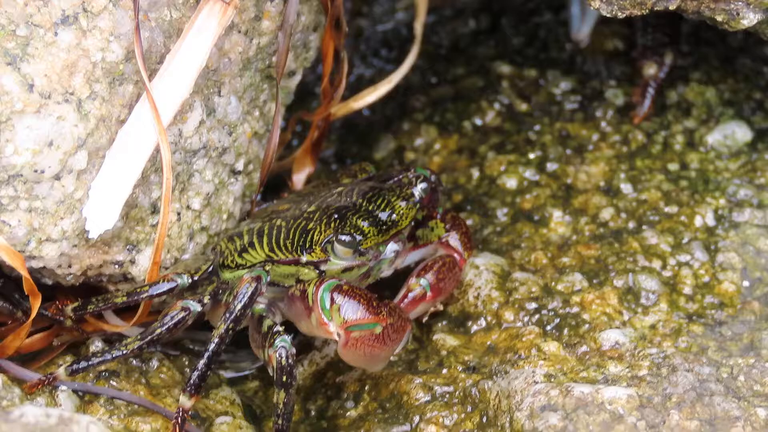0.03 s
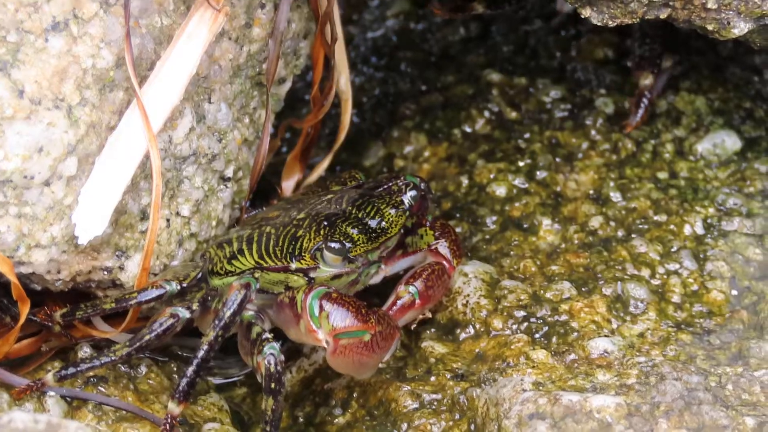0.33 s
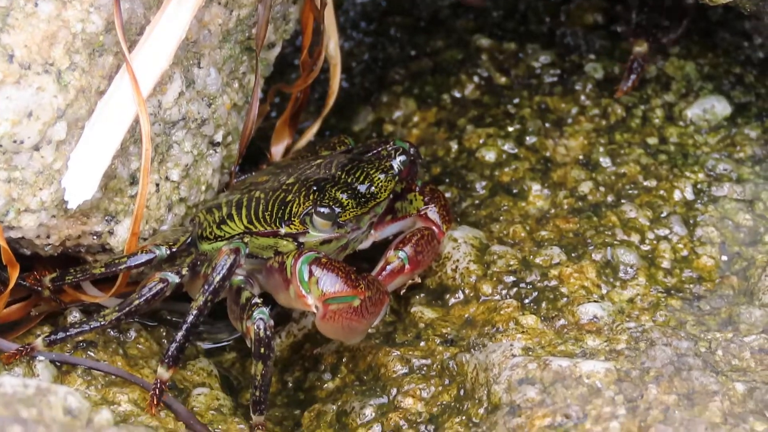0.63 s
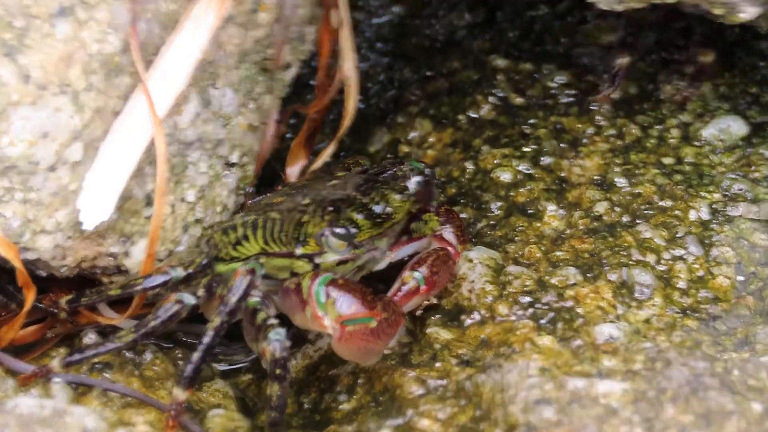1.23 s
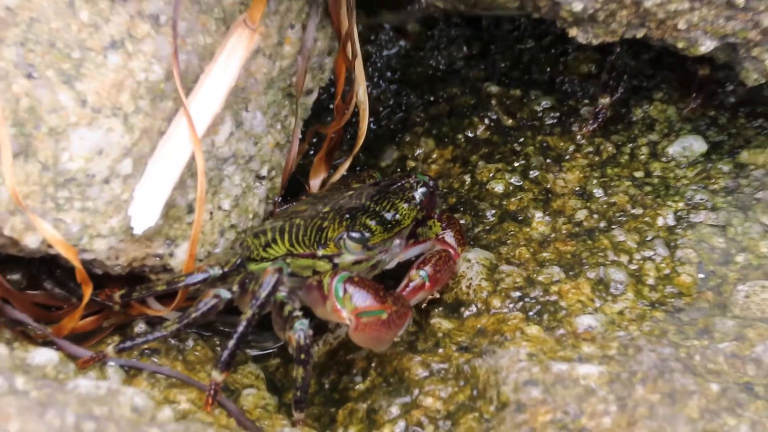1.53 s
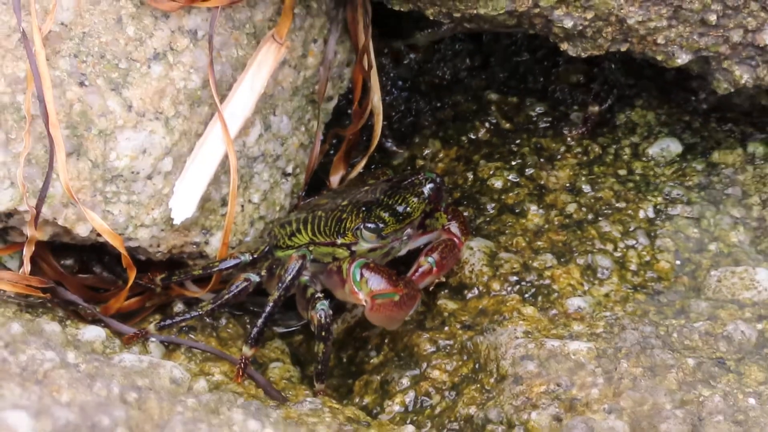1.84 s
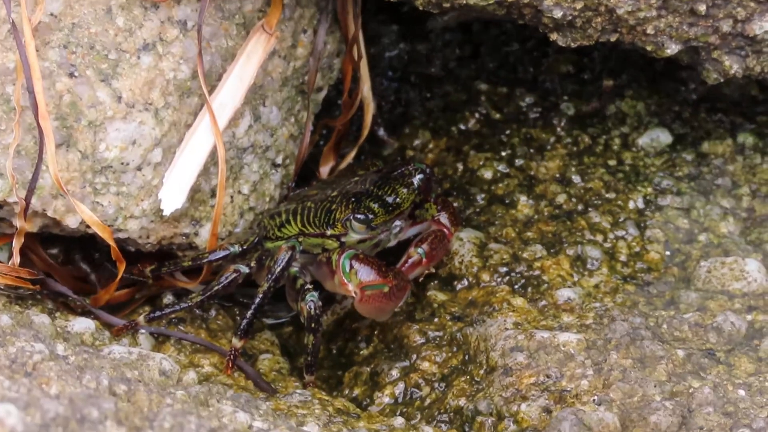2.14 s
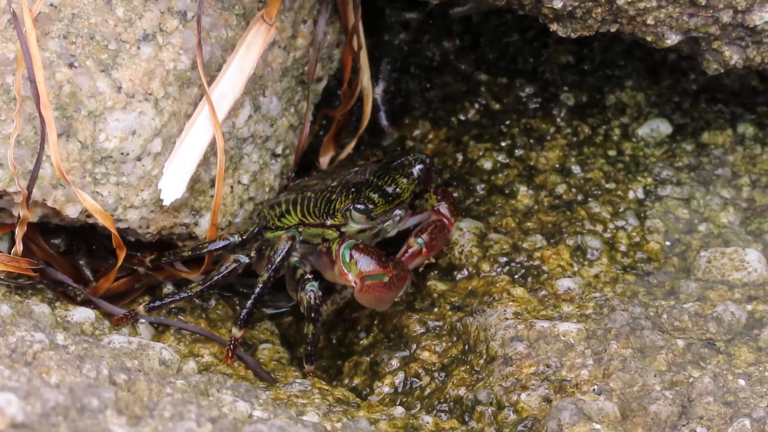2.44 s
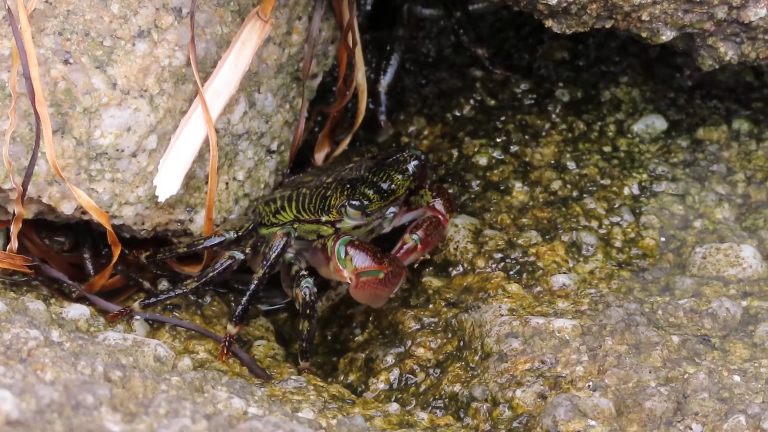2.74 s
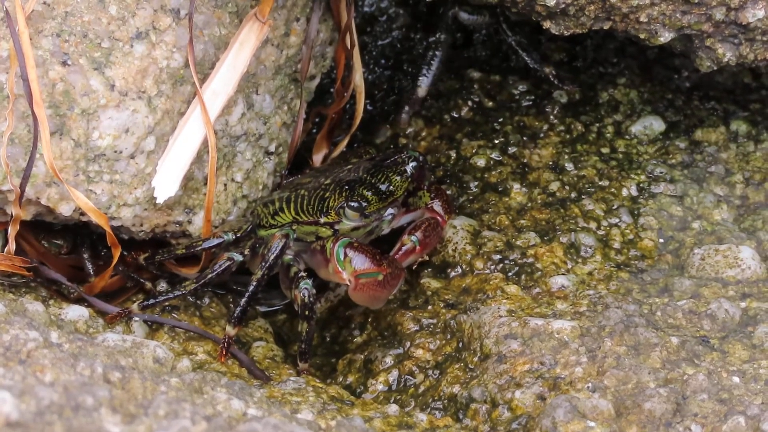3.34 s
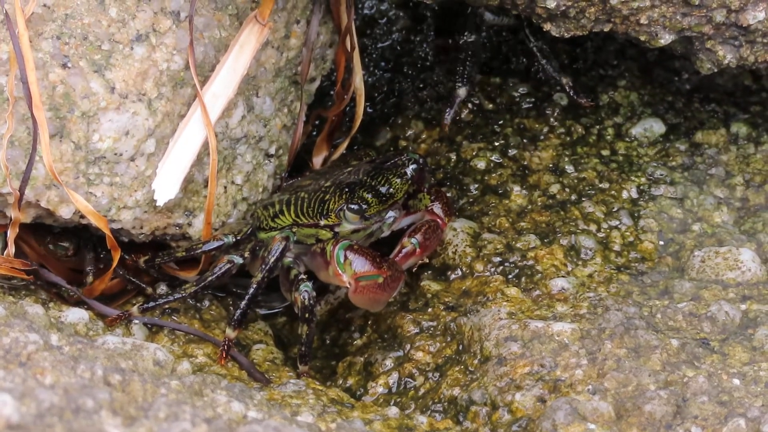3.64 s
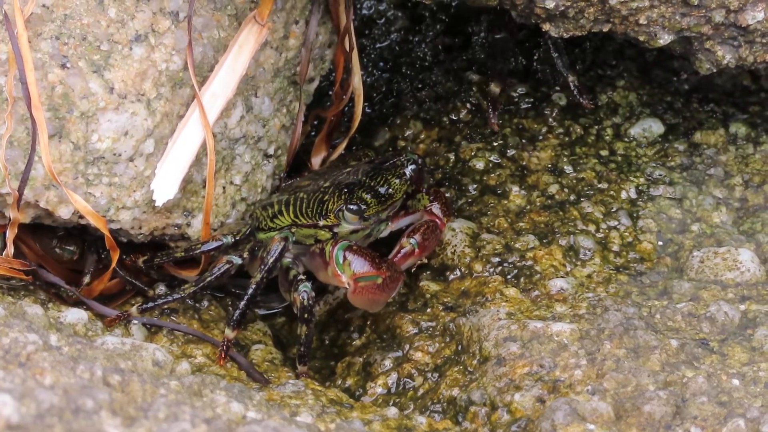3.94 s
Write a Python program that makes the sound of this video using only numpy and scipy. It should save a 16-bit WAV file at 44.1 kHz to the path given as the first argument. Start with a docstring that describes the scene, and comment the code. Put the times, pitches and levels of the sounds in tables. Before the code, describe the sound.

Wind rumbles on the microphone over steady surf, small sloshes and a distant engine hum.

```python
"""Among rocky tide pools, in stereo. The sound cuts in on wind rumbling at the microphone, the steady
roar of the far sea, a nearer wash with hissing foam and the hum of a far engine. Close by, water sloshes,
tiny bubbles tick on the wet stone and air pockets glug between the rocks. At about 1.4 s the nearer wash
drops away for half a second, then builds again, with more sloshes and ticks."""
import sys
import numpy as np
from scipy import signal
from scipy.fft import rfft, irfft
from scipy.io import wavfile
from scipy.ndimage import uniform_filter1d

SR = 44100
rng = np.random.default_rng(int(sys.argv[2]) if len(sys.argv) > 2 else 0)


def waveform_to_disk(signal):
    """Save audio, clipped to [-1, 1], as 16-bit WAV at the path in sys.argv[1]."""
    frames = np.transpose(np.atleast_2d(signal))
    scaled = np.clip(frames, -1, 1) * 32767
    samples = np.round(scaled).astype(np.int16)
    wavfile.write(sys.argv[1], SR, samples)


N = 176400


def undb(db):
    """Decibels to gain."""
    return 10 ** (np.asarray(db) / 20)


def clock():
    """Time of every sample in seconds."""
    return np.arange(N) / SR


def curve(table, column):
    """One column of a table joined by straight lines in time."""
    rows = np.array(table)
    return np.interp(clock(), rows[:, 0], rows[:, column])


def walk(rate_hz):
    """Random levels held 1 / rate_hz seconds and smoothed twice; spread 1."""
    hold = max(int(SR / rate_hz), 2)
    steps = np.repeat(rng.standard_normal(400), hold)[:N]
    smooth = uniform_filter1d(uniform_filter1d(steps, hold), hold)
    return np.resize(smooth / smooth.std(), N)


def noise(spectrum):
    """Noise of rms 1, coloured by rows of (frequency [Hz], level [dB]), falling steeply past the ends."""
    hz, db = np.array(spectrum, float).T
    log_hz = np.log(np.maximum(np.fft.rfftfreq(N, 1 / SR), 1))
    beyond = log_hz - np.clip(log_hz, np.log(hz[0]), np.log(hz[-1]))
    colour = undb(np.interp(log_hz, np.log(hz), db)) * np.exp(-2 * np.abs(beyond))
    coloured = irfft(rfft(rng.standard_normal(N)) * colour, N)
    return coloured / coloured.std()


def wide(spectrum, side_db, pan_db=0, lag_s=0):
    """Mid-side stereo noise; positive pan leans left, and the left channel arrives lag_s late."""
    mid, side = noise(spectrum), undb(side_db) * noise(spectrum)
    delay = np.exp(-2j * np.pi * np.fft.rfftfreq(N, 1 / SR) * lag_s)
    left = irfft(rfft(mid + side) * delay, N)
    return np.array([left * undb(pan_db / 2), (mid - side) * undb(-pan_db / 2)])


def swells(table, octaves):
    """Short swells of noise, each 12 dB down this many octaves either side of its centre frequency."""
    out = np.zeros(N)
    for at, half_length, hz, db in table:
        shape = np.exp(-((clock() - at) / half_length) ** 2)
        swell = shape * noise([(hz / 2 ** octaves, -12), (hz, 0), (hz * 2 ** octaves, -12)])
        out += undb(db) * swell * np.linalg.norm(shape) / np.linalg.norm(swell)
    return out


def wind():
    """Wind at the microphone: a gusty low rumble with short buffets."""
    # Colour of the rumble (frequency [Hz], relative level [dB])
    spectrum = [(15, -16), (28, -4.5), (45, -2), (75, 0.5), (110, -0.5), (135, 0), (175, -5.5), (215, -5.5),
                (250, -20), (400, -35)]
    # Buffets (time [s], half-length [s], centre [Hz], level [dB])
    buffets = [(.355, 0.026, 136, -31), (.44, 0.0075, 139, -35), (.53, 0.0087, 156, -30.5),
               (.645, 0.01, 175, -32.5), (1.302, .012, 75, -32.5), (1.415, 0.026, 122, -36.5),
               (1.6, 0.095, 52.6, -39), (2.73, 0.014, 71.5, -25.5), (3.325, 0.0214, 116, -34.5),
               (3.975, .02, 71, -28.5)]
    level_db, gust_db = -36.5, 0.35
    rumble = wide(spectrum, side_db=-26) * undb(level_db + gust_db * walk(12.0))
    return rumble + swells(buffets, octaves=0.44)


def far_sea():
    """Breakers far off merge into a steady roar, heaving slightly."""
    # Colour of the roar (frequency [Hz], relative level [dB])
    spectrum = [(120, -2), (260, 0.5), (380, 0.9), (460, -2), (535, 0.5), (630, -10), (820, -11),
                (1500, -21), (3200, -39.5), (5500, -36), (10000, -41), (15500, -57)]
    level_db, heave_db = -44.5, 0.64
    return wide(spectrum, side_db=-8, pan_db=-0.5) * undb(level_db + heave_db * walk(6.46))


def near_surf():
    """Nearer water churns and fizzes a little to the right; its wide foam hiss narrows in the lull."""
    # Course of the surf (time [s], wash [dB], fizz [dB], foam [dB], gain on the foam's side signal [dB])
    surf = [(.1, -46.5, -65.5, -57, -2), (.45, -46, -56.5, -58.5, 1), (.72, -46.5, -61.5, -58.5, 0),
            (.89, -45.5, -60, -59, 0), (1.15, -48.5, -60.5, -60, -0.5), (1.37, -49.5, -64, -57.3, -2),
            (1.44, -58, -68, -58, -15), (1.97, -57.5, -70, -58.5, -14), (2.0, -46.5, -64.5, -56.5, -4),
            (2.2, -48, -63, -59, -1), (2.42, -46.5, -62, -60.5, 1), (2.6, -45, -58.5, -60, -2),
            (2.74, -46, -62, -60.3, 1.5), (2.97, -44.5, -58, -60.5, -1), (3.15, -42.5, -56.5, -59, 1),
            (3.35, -44.6, -56, -60, 1), (3.62, -43, -56.5, -56, -1), (3.73, -45, -55, -57, .5),
            (3.85, -45, -53, -57, 0), (4, -45, -55, -58, 0)]
    # Colours of churning water, fizzing crests and foam (frequency [Hz], relative level [dB])
    wash_spectrum = [(200, -8), (400, 0), (650, 2), (1000, -0.8), (1600, -3.5), (2300, -9.5), (3200, -20),
                     (5000, -34), (9000, -50)]
    fizz_spectrum = [(1100, -13), (1900, -2.5), (2800, 1.5), (3600, -0.5), (5000, -10), (7000, -13),
                     (10000, -36)]
    foam_spectrum = [(900, -5.5), (2000, 5), (3000, 0.5), (4500, -2), (7000, -6.5), (10000, -11.5),
                     (13000, -15), (15500, -21)]
    lag_s = .000038
    churn_db = 0.65 * walk(16)  # moves wash and fizz together
    wash = wide(wash_spectrum, side_db=-11.5, pan_db=-2.5, lag_s=lag_s / 2)
    wash *= undb(curve(surf, column=1) + churn_db)
    fizz = wide(fizz_spectrum, side_db=-7, pan_db=-2.5, lag_s=lag_s)
    fizz *= undb(curve(surf, column=2) + churn_db)
    foam = wide(foam_spectrum, side_db=-5, pan_db=0.3, lag_s=lag_s)
    foam *= undb(curve(surf, column=3) + walk(7.4))
    foam_mid = foam.mean(axis=0)
    foam_side = (foam - foam_mid) * undb(curve(surf, column=4))
    return wash + fizz + foam_mid + foam_side


def far_engine():
    """Only two low orders and a dull rumble carry this far; the hum creeps up and wavers in the wind."""
    # Course of the engine (time [s], hum [Hz], level [dB])
    course = [(.1, 145.7, -37), (.9, 147.5, -40), (1.5, 150.4, -38.5), (1.85, 149.2, -43.5),
              (2.2, 150, -37), (2.58, 150.1, -31), (2.73, 149.9, -35.5), (3.0, 151.3, -33.5),
              (3.5, 154, -36.5), (4, 153.6, -39)]
    # Engine orders (multiple of the firing rate, relative level [dB])
    orders = [(1, -10.5), (2, -1.5)]
    # Colour of the rumble (frequency [Hz], relative level [dB])
    rumble_spectrum = [(140, -16), (165, 0), (185, -2), (215, -8), (245, -14.5)]
    waver_db, rumble_db, wander_rad = 1.1, -6.5, 0.28
    hum_phase = 2 * np.pi * np.cumsum(curve(course, column=1)) / SR + wander_rad * walk(22)
    firing_phase = hum_phase / 2
    hum = np.zeros(N)
    for order, db in orders:
        amplitude = np.sqrt(2) * undb(db + waver_db * walk(18))
        hum += amplitude * np.sin(order * firing_phase + 2 * np.pi * rng.random())
    rumble = undb(rumble_db) * noise(rumble_spectrum)
    return (hum + rumble) * undb(curve(course, column=2))


def sloshes():
    """Water slops among the nearby rocks in short, dull swells."""
    # Sloshes (time [s], half-length [s], centre [Hz], level [dB])
    slops = [(.33, 0.024, 320, -42), (2.216, 0.034, 826, -46), (2.68, 0.028, 403, -44)]
    return swells(slops, octaves=0.38)


def bubble_ticks():
    """Tiny bubbles burst close by: a very short high ring and a faint scatter off the stone."""
    # Bursting bubbles (time [s], pitch [Hz], level [dB], decay [s])
    bursts = [(.87, 13500, -59, .0007), (1.49, 13900, -60, .0007), (2.514, 12000, -50.5, .0013),
              (2.679, 14300, -56.5, .0007), (3.6425, 14300, -48, .0008), (3.8055, 14300, -44.5, 0.0011)]
    scatter_width_hz, tail_db, tail_s = 1700, -13, .004
    out = np.zeros((2, N))
    for at, hz, db, decay in bursts:
        age = np.maximum(clock() - at, 0)
        ring = np.exp(-age / decay) * np.sin(2 * np.pi * hz * age)
        band = signal.iirpeak(hz, hz / scatter_width_hz, fs=SR)
        scatter = signal.lfilter(*band, rng.standard_normal((2, N)))
        tail = (age > 0) * undb(tail_db) * np.exp(-age / tail_s)
        out += undb(db) * (ring + tail * scatter / scatter.std())
    return out


def glugs():
    """Air pockets in a crevice ring for a few cycles, rising in pitch."""
    # Air pockets (time [s], pitch [Hz], half-length [s], level [dB])
    pockets = [(1.288, 297.3, 0.0076, -42), (1.33, 460, 0.0081, -30), (1.336, 278, 0.0061, -31.5)]
    rise_per_s = 4.8  # as a share of the pitch
    out = np.zeros(N)
    for at, hz, half_length, db in pockets:
        age = clock() - at
        phase = 2 * np.pi * hz * age * (1 + rise_per_s * age / 2)
        out += undb(db) * np.exp(-(age / half_length) ** 2) * np.sin(phase)
    return out


def scene():
    """Wind, sea and engine around the small, close sounds of the pools."""
    return wind() + far_sea() + near_surf() + far_engine() + sloshes() + bubble_ticks() + glugs()


def record(dry):
    """At the microphone the sound cuts in abruptly and loses its very top."""
    start_s, fade_s, top_hz = 0.102, .002, 15700
    fade_in = np.clip((clock() - start_s) / fade_s, 0, 1)
    lowpass = signal.ellip(10, .2, 80, top_hz, fs=SR, output="sos")
    return signal.sosfilt(lowpass, dry * fade_in)


dry = scene()
out = record(dry)
waveform_to_disk(out)
```